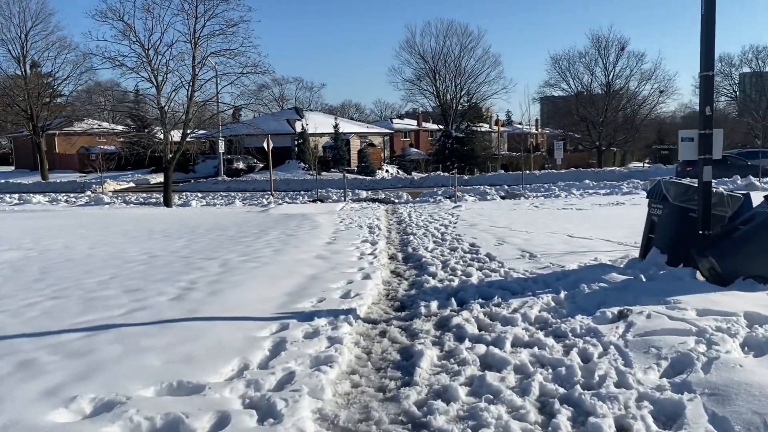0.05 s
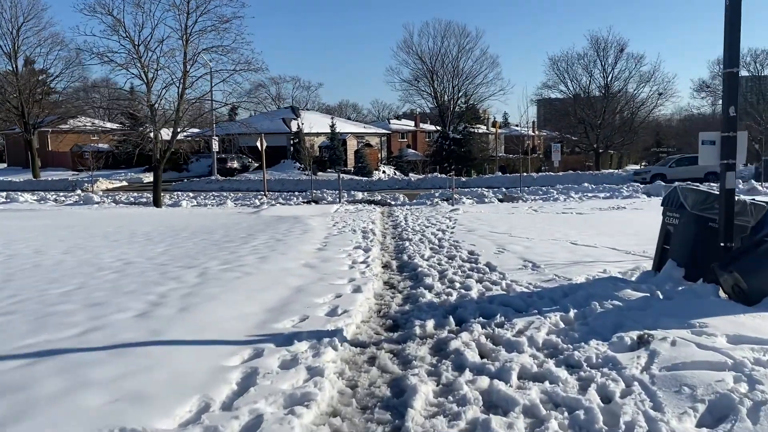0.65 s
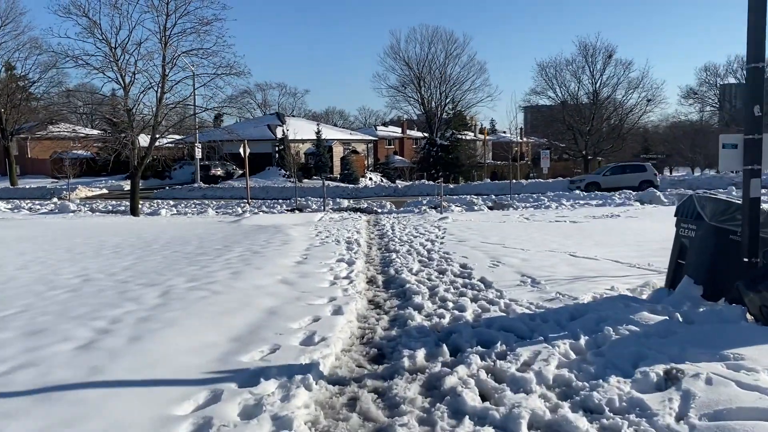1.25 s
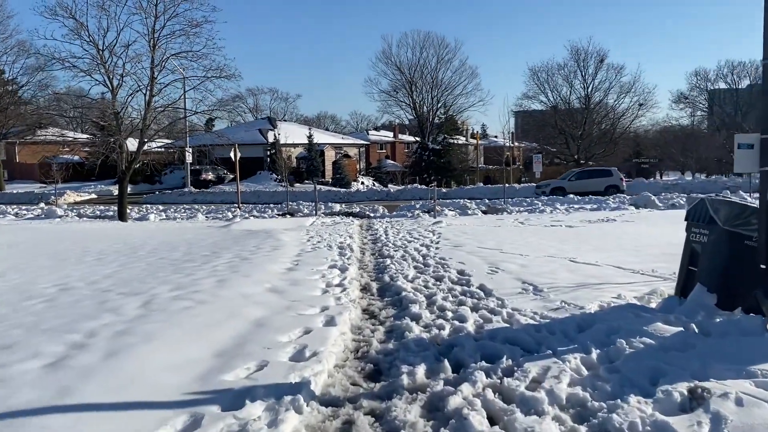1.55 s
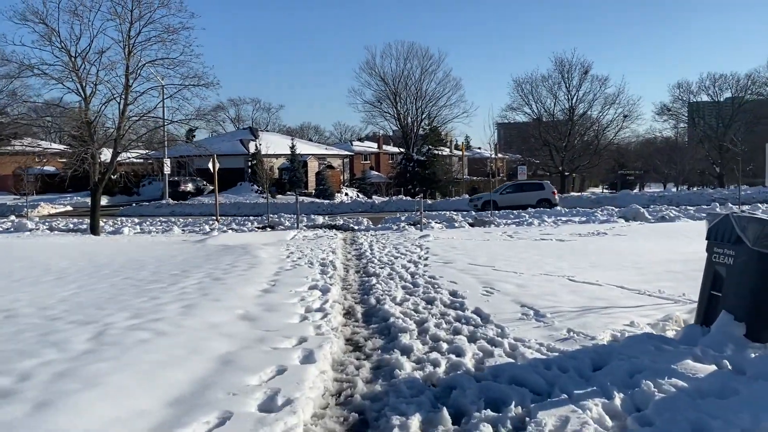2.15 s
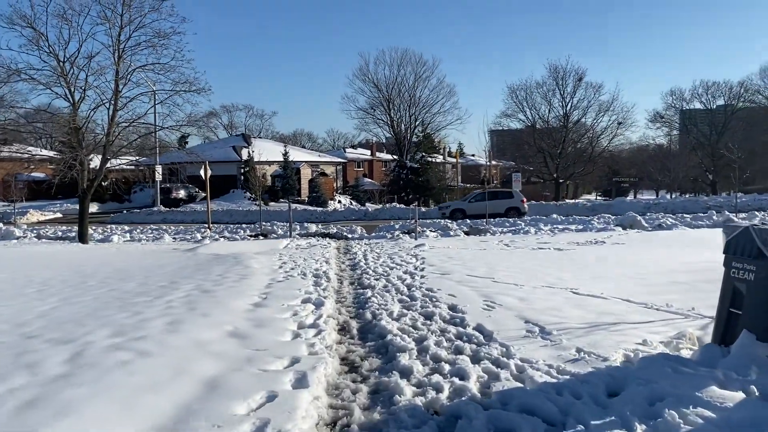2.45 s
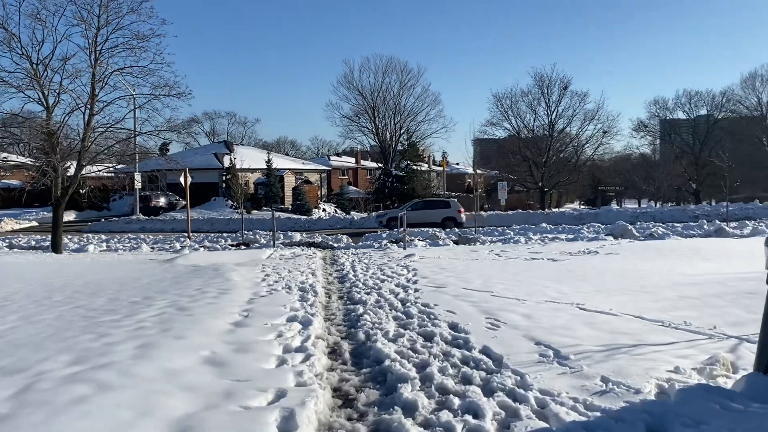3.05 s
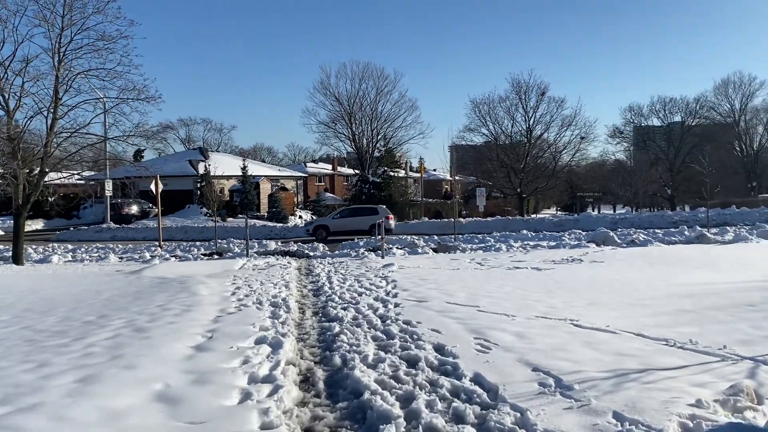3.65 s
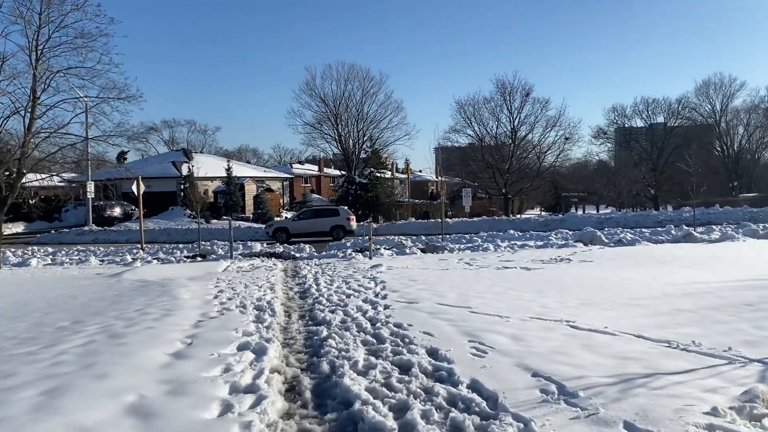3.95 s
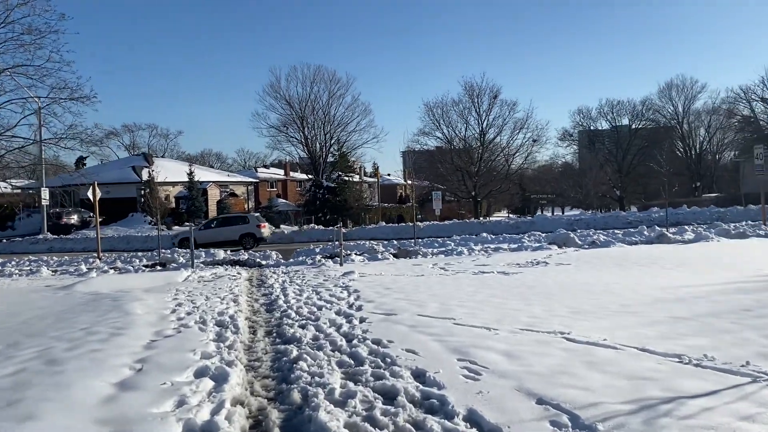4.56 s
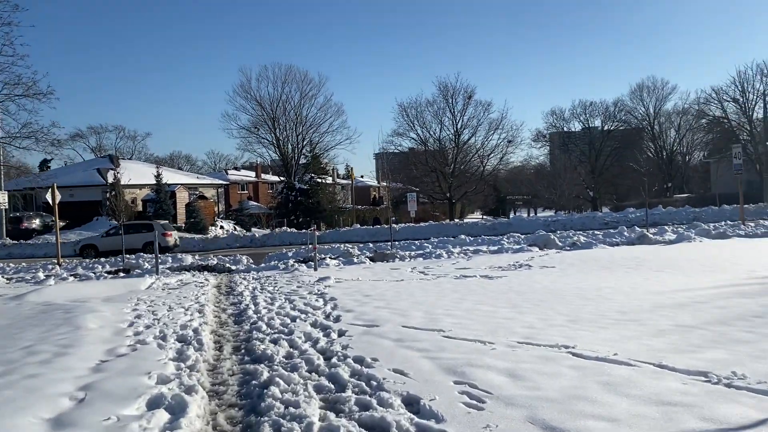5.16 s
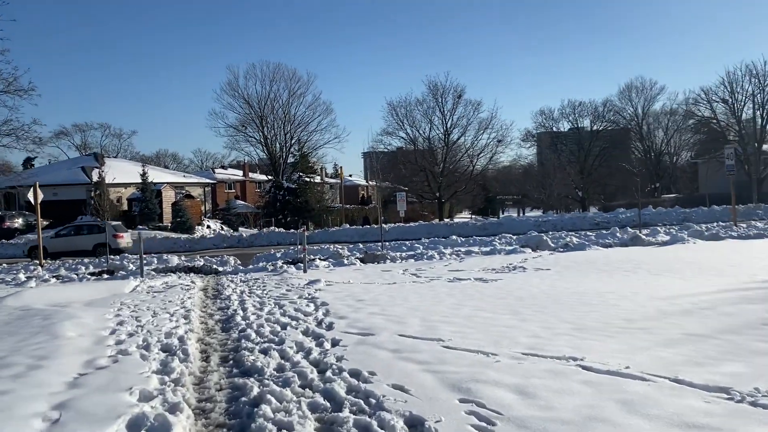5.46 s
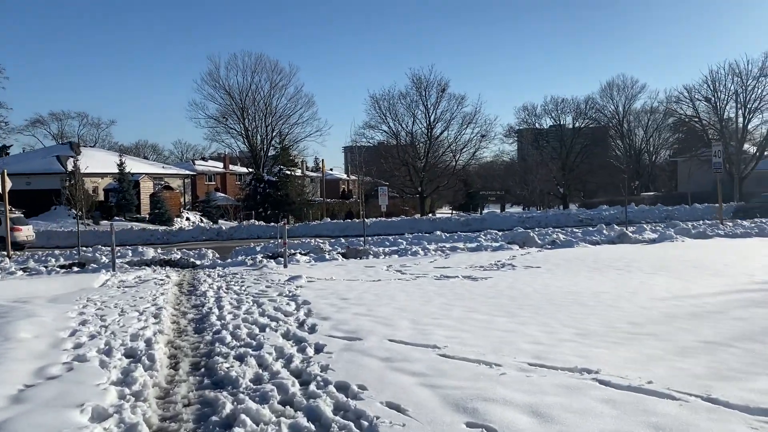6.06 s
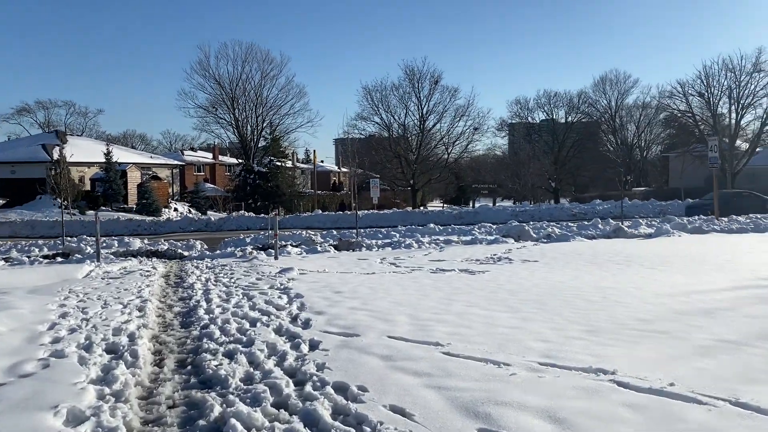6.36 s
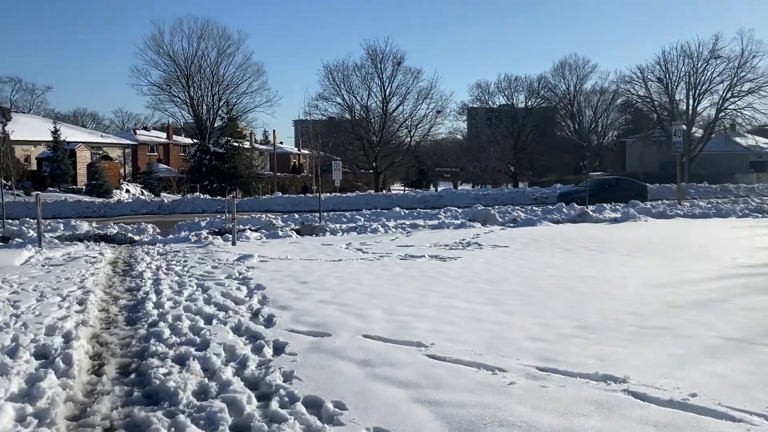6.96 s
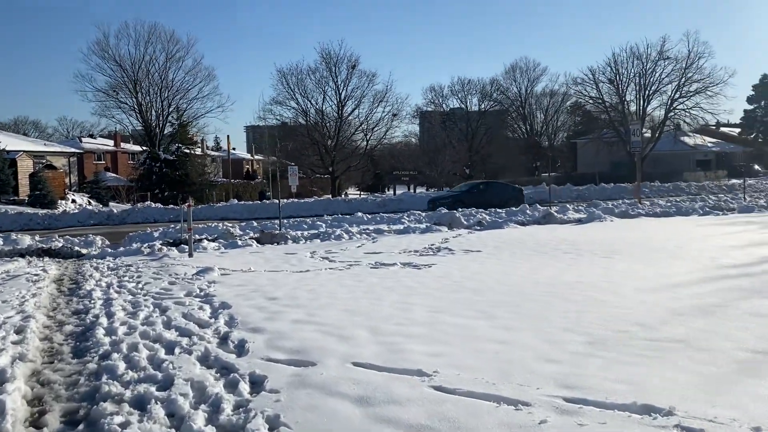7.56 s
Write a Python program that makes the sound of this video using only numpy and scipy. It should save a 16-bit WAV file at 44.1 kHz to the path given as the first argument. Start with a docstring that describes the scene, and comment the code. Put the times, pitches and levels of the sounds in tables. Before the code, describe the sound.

Boots walk at a steady pace along a trodden path in a snowy field, close below a handheld microphone. Each step crunches and hisses, with sharp snaps of icy crust and small creaks as the snow packs. Wind rumbles and flutters on the microphone throughout, gusting harder around the middle. Some way ahead, car tyres roar softly on a slushy road.

```python
"""Footsteps on crusted snow

A trodden path across a snowy field, heard from a phone in the walker's hand. At each step the icy
crust snaps, loose grains hiss, and the snow under the sole crunches and creaks as it packs.
Wind buffets the microphone; some way ahead, tyres roar and hiss on a slushy road."""
import sys
import numpy as np
from scipy import signal
from scipy.fft import rfft, irfft, next_fast_len
from scipy.io import wavfile
from scipy.ndimage import uniform_filter1d

SR = 44100
rng = np.random.default_rng(int(sys.argv[2]) if len(sys.argv) > 2 else 0)


def wav_record(signal):
    """Record a signal, one row per channel, as 16-bit PCM in the file named by sys.argv[1]."""
    frames = np.transpose(np.atleast_2d(signal))
    bounded = np.clip(frames, -1, 1)
    # unit amplitude maps onto the largest positive 16-bit level
    quanta = np.round(bounded * 32767).astype(np.int16)
    wavfile.write(sys.argv[1], SR, quanta)


N = 344862

# spectrum of crunching snow, under the sole and in the crust (f/Hz, level/dB)
CRUNCH_SPECTRUM = [(200, -31), (450, 4.5), (800, 6.5), (1400, 3.5), (2200, 0.5), (3200, -8.5), (5000, -21),
                   (9000, -44)]


def from_db(db):
    """Decibels to gain."""
    return 10 ** (np.asarray(db) / 20)


def rms_one(x):
    """Scale to unit rms."""
    return x / np.sqrt(np.mean(x ** 2) + 1e-20)


def as_strong(x, model):
    """Scale x to the rms of the model."""
    return rms_one(x) * np.sqrt(np.mean(model ** 2))


def even_out(x, seconds):
    """Hold the short-term rms near 1, so that a level curve sets the strength."""
    power = uniform_filter1d(np.mean(x ** 2, axis=0), size=int(seconds * SR) + 1)
    return x / np.sqrt(np.abs(power) + 1e-6)


def times():
    """The time of every sample in seconds."""
    return np.arange(N) / SR


def in_time(rows):
    """One curve for each column after the time, its points joined by straight lines."""
    s, *columns = np.transpose(rows)
    return [np.interp(times(), s, column) for column in columns]


def colour(x, spectrum):
    """Filter by a spectrum drawn over log frequency; rms 1."""
    hz, db = np.transpose(spectrum)
    bin_hz = np.arange(N // 2 + 1) * SR / N
    gain = from_db(np.interp(np.log(bin_hz + 1), np.log(hz), db))
    return rms_one(irfft(rfft(x) * gain, N))


def drift(rate_hz):
    """A slow random wander, softly limited to +-2."""
    size = next_fast_len(N // 20 + 2)  # one point per 20 samples
    hz = np.arange(size // 2 + 1) * SR / (20 * size)
    slow = rms_one(irfft(rfft(rng.standard_normal(size)) / (1 + (hz / rate_hz) ** 2), size))
    return np.interp(np.arange(N) / 20, np.arange(size), 2 * np.tanh(slow / 2))


def spread(pair, side_db):
    """Use two unrelated signals as mid and side; gives left and right."""
    side = from_db(side_db)
    return (pair[0] + side * pair[1] * np.array([[1], [-1]])) / np.sqrt(1 + side ** 2)


def stereo_noise(side_db, length=N):
    """White noise, wider as side_db rises towards 0."""
    return spread(rng.standard_normal((2, length)), side_db)


def resonate(x, hz, width_hz):
    """One resonance with gain 1 at its peak."""
    r = np.exp(-np.pi * width_hz / SR)
    feedback = [1, -2 * r * np.cos(2 * np.pi * hz / SR), r * r]
    return signal.lfilter(np.array([1, 0, -1]) * (1 - r * r) / 2, feedback, x)


def pulse(age):
    """An envelope that rises to 1 at age 1 and dies away."""
    return (age * np.exp(1 - age)) ** 2


def add(out, s, sound):
    """Mix a short sound in at time s."""
    start = int(np.clip(s * SR, 0, N - 1))
    out[..., start:start + sound.shape[-1]] += sound[..., :N - start]


def grains(per_s, size_db):
    """Two trains of impulses at random moments, mostly small, a few large."""
    out, born = np.zeros((2, N)), rng.random((2, N)) < per_s / SR
    count = np.count_nonzero(born)
    sizes = from_db(size_db * np.minimum(rng.exponential(1, count), 4))
    out[born] = sizes * rng.choice([-1, 1], count)
    return out


def far_road(echo_s, echo_db):
    """Tyres some way ahead: a wide roar and a faint hiss of slush, made hollow by a reflection."""
    # cars passing (t/s, roar level/dB, relative spray level/dB)
    traffic = [(0.0, -52, -84), (0.6, -53, -88), (1.85, -51.5, -76.5), (2.35, -46.5, -63.5),
               (2.9, -48.5, -65.5), (3.1, -52, -83.5), (3.9, -47.5, -66), (4.9, -47.5, -77.5),
               (5.97, -45.5, -79), (7.82, -46.5, -77.5)]
    # spectrum of the tyre roar (f/Hz, level/dB)
    roar_spectrum = [(40, 22.5), (150, -11.5), (400, 12), (700, 6.5), (1300, -1), (1950, -0.5), (3000, -10),
                     (5000, -18.5), (9000, -27.5), (16000, -78)]
    # spectrum of the spray from wet tyres (f/Hz, level/dB)
    spray_spectrum = [(1500, -13), (3000, 2), (4700, 7.5), (7200, -2.5), (8300, 9.5), (11000, -4),
                      (16000, -17)]
    roar_db, spray_db = in_time(traffic)
    roar = colour(stereo_noise(side_db=-4), roar_spectrum)
    direct = stereo_noise(side_db=-10)
    reflection = from_db(echo_db) * np.roll(direct, int(echo_s * SR), axis=1)
    spray = colour(direct + reflection, spray_spectrum)
    return from_db(roar_db) * roar + from_db(spray_db + 4.5) * spray


def wind(breeze_db, flutter_growth):
    """Turbulence at the microphone ports: a deep rumble, and small eddies that flutter past in lumps."""
    # strength of the wind on the microphone (t/s, level/dB)
    gusts = [(0.0, -40.5), (0.45, -36), (1.0, -36.5), (1.97, -36), (2.1, -41), (2.7, -35), (3.2, -35.5),
             (3.68, -37.5), (3.96, -23.5), (4.06, -33), (4.45, -32), (4.85, -36.5), (5.0, -32.5),
             (5.45, -26), (5.85, -29), (6.15, -38), (7.3, -38), (7.82, -39)]
    # the air falls calm for a moment (middle t/s, half length/s, depth/dB)
    lulls = [(0.17, 0.021, 14), (0.35, 0.069, 8.5), (0.665, 0.021, 6), (1.172, 0.035, 4.5),
             (1.738, 0.022, 12), (2.272, 0.017, 16), (2.593, 0.11, 9.5), (2.955, 0.13, 4.5),
             (4.114, 0.089, 15), (4.903, 0.042, 10), (5.105, 0.039, 7), (6.266, 0.065, 4),
             (6.518, 0.042, 11), (7.63, 0.029, 12), (1.83, 0.016, 3), (5.218, 0.018, 6),
             (5.346, 0.018, 8.5), (5.476, 0.018, 9), (5.916, 0.016, 12), (6.675, 0.023, 7)]
    # spectrum of the rumble (f/Hz, level/dB)
    rumble_spectrum = [(25, -34), (40, -15), (60, 2), (80, 0.5), (115, -2), (170, -8.5), (260, -19.5),
                       (600, -84)]
    # spectrum of the flutter (f/Hz, level/dB)
    flutter_spectrum = [(70, -27), (130, -13), (200, 3.5), (300, 2.5), (450, -6.5), (650, -18), (1000, -41)]
    t = times()
    lull_db = sum(db * np.exp(-np.minimum(((t - s) / half_s) ** 2, 20)) for s, half_s, db in lulls)
    gust_db = in_time(gusts)[0] - lull_db
    flutter_db = breeze_db - 10 + flutter_growth * (gust_db - breeze_db)  # stronger wind flutters more
    lumps = drift(rate_hz=20)
    pressure = stereo_noise(side_db=-10) * from_db(3.6 * lumps)
    flicks = spread(grains(per_s=300, size_db=3.5), side_db=-10) * from_db(7.3 * lumps)
    rumble = even_out(colour(pressure, rumble_spectrum), seconds=0.13)
    flutter = even_out(colour(flicks, flutter_spectrum), seconds=0.218)
    return from_db(gust_db + 0.5) * rumble + from_db(flutter_db) * flutter


def eddies(rise_cycles, wake_db, wake_s):
    """A puff is a pressure swing of a cycle or two, with a short turbulent wake."""
    # single puffs hitting the microphone (t/s, relative level/dB, f/Hz)
    puffs = [(0.12, -23.5, 260), (0.378, -29, 204), (0.423, -28, 106), (0.466, -28, 72.6),
             (0.529, -28.5, 288), (0.707, -24, 90.5), (0.752, -22.5, 155), (0.972, -19.5, 145),
             (1.03, -24.5, 145), (1.203, -33, 134), (1.295, -21.5, 94), (1.56, -24, 148),
             (1.654, -27.5, 140), (1.773, -27, 139), (1.892, -29, 106), (1.931, -20, 167),
             (1.973, -21.5, 112), (2.309, -25.5, 142), (3.085, -25, 159), (3.457, -29, 135),
             (3.743, -19.5, 174), (3.812, -16.5, 310), (3.845, -27, 377), (3.935, -16.5, 210),
             (4.215, -29, 151), (4.259, -26.5, 276), (4.588, -28, 167), (4.982, -20, 240),
             (5.029, -20, 146), (5.174, -20.5, 274), (5.254, -19.5, 228), (5.372, -22, 360),
             (5.39, -16, 109), (5.433, -21.5, 310), (5.459, -24.5, 640), (5.591, -27, 330),
             (5.628, -25.5, 262), (5.681, -18.5, 270), (5.747, -22, 141), (5.87, -21.5, 294),
             (5.951, -24, 130), (6.1, -23, 116), (6.365, -28.5, 117), (6.615, -18, 73.5),
             (6.62, -25.5, 186), (6.692, -23.5, 103), (6.734, -24, 167), (6.834, -24.5, 198),
             (6.986, -23, 81.4), (7.101, -27.5, 159), (7.188, -26, 145), (7.285, -27.5, 132),
             (7.469, -23, 124), (7.749, -24.5, 188)]
    out, t = np.zeros((2, N)), np.arange(SR // 8) / SR
    wake = pulse(t / wake_s)
    for s, db, hz in puffs:
        swing = pulse(t * hz / rise_cycles) * np.sin(2 * np.pi * (hz * t + rng.random()))
        noise = stereo_noise(side_db=-7.5, length=len(t))
        churn = resonate(resonate(noise, hz, hz), hz, 2 * hz)
        add(out, s, from_db(db) * (swing + from_db(wake_db) * as_strong(churn * wake, wake)))
    return out


def creaks(slips_per_s, slip_t60, scatter, overtone_db, grit_db):
    """The sole sticks and slips; each slip is a gritty knock, mostly higher as the snow gets denser."""
    # packed snow creaking (start t/s, end t/s, first f/Hz, last f/Hz, level/dB)
    glides = [(0.238, 0.293, 950, 1360, -44.5), (0.313, 0.39, 1380, 1620, -56.5),
              (1.503, 1.634, 1180, 1440, -43), (2.091, 2.216, 1240, 1460, -48.5),
              (2.735, 2.767, 2200, 2820, -49), (2.799, 2.884, 760, 1150, -44.5),
              (3.337, 3.409, 730, 1200, -53.5), (4.037, 4.116, 1320, 1320, -51.5),
              (4.648, 4.767, 930, 1030, -54), (7.038, 7.089, 1390, 1720, -47.5),
              (7.605, 7.669, 1050, 1500, -45.5)]
    out, t = np.zeros(N), np.arange(SR // 40) / SR
    envelope = from_db(-60 * t / slip_t60) * (1 - np.exp(-t / 0.00088))
    for start, end, first_hz, last_hz, level_db in glides:
        chance, noises = rng.standard_normal((80, 4)), rng.standard_normal((80, len(t)))
        moments = start + np.cumsum(np.exp(0.45 * chance[:, 0])) / slips_per_s
        creak = np.zeros(N)
        for s, (_, size, detune, upper_detune), noise in zip(moments[moments < end], chance, noises):
            hz = np.interp(s, [start, end], [first_hz, last_hz]) * np.exp(scatter * detune)
            upper_hz = 2 * hz * np.exp(scatter * upper_detune)
            ring = np.sin(2 * np.pi * hz * t) + from_db(overtone_db) * np.sin(2 * np.pi * upper_hz * t)
            grit = from_db(grit_db) * rms_one(resonate(noise, hz, hz))
            add(creak, s, (ring + grit) * envelope * from_db(1.15 * size))
        out += from_db(level_db) * rms_one(creak) * np.sqrt((end - start) * SR / N)
    return out


def pops(t60, grit_db):
    """A frozen lump gives way all at once: a short, hollow, gritty knock."""
    # single lumps under the boot (t/s, f/Hz, level/dB)
    lumps = [(0.486, 1950, -44), (0.62, 1550, -43), (0.944, 1520, -30), (1.588, 1200, -22),
             (1.834, 1400, -38), (2.209, 1400, -35), (3.098, 1460, -36), (4.014, 730, -27),
             (5.9, 1480, -27), (6.218, 1720, -31), (7.005, 1360, -28), (7.646, 1450, -27)]
    out, t = np.zeros(N), np.arange(SR // 20) / SR
    envelope = from_db(-60 * t / t60) * (1 - np.exp(-t / 0.0015))
    for s, hz, db in lumps:
        grit = rms_one(resonate(resonate(rng.standard_normal(len(t)), hz, hz), hz, 2 * hz))
        add(out, s, from_db(db) * envelope * (np.sin(2 * np.pi * hz * t) + from_db(grit_db) * grit))
    return out


def crust_snaps(ring_width_hz, crumble_db, crumble_t60):
    """A crack runs through the crust in milliseconds; the piece rings, splinters and crumbles."""
    # pieces of crust snapping (t/s, breaking time/s, main ring f/Hz, its level/dB,
    # second ring f/Hz, its level/dB, splinter level/dB, crunch level/dB)
    cracks = [(0.12, 0.00074, 3640, -36, 6300, -30, -25.5, -32.5),
              (0.195, 0.00062, 2530, -31, 5600, -40, -39, -54),
              (0.433, 0.0055, 1720, -48, 3740, -62, -47.5, -40.5),
              (0.638, 0.0058, 2400, -47, 2850, -54, -48.5, -46.5),
              (.856, 0.0022, 1210, -40, 2980, -45, -59, -51),
              (1.279, 0.0021, 1590, -45, 4900, -41, -52, -43),
              (1.6058, 0.0015, 1450, -30.5, 3100, -38, -37, -33),
              (2.026, .003, 1850, -40, 4160, -68, -45, -53), (2.44, 0.0039, 1640, -47, 3530, -56, -41, -44),
              (2.694, 0.0014, 3970, -41, 7800, -47, -40, -52),
              (3.772, 0.0043, 1480, -55, 6100, -66, -54.5, -50),
              (4.849, 0.0048, 920, -45, 1590, -49, -52, -40.5),
              (5.0689, 0.0059, 1890, -36, 3540, -34.5, -35.5, -33),
              (5.693, 0.0076, 2660, -40, 1820, -49, -61, -36),
              (5.803, 0.0038, 2650, -36.5, 1780, -50, -45, -38.5),
              (5.911, 0.00079, 2720, -23, 3800, -28.5, -33, -52),
              (6.2017, 0.0041, 1450, -41.5, 2340, -45, -37.5, -39),
              (6.287, .002, 1720, -38, 3500, -59, -50, -50),
              (6.3739, 0.0011, 2240, -25.5, 3300, -36, -38, -36),
              (6.398, 0.0021, 3250, -36, 1720, -56, -40, -35),
              (7.405, 0.0068, 1270, -49, 4770, -52, -47, -45.5),
              (7.7605, 0.0019, 1940, -36, 3000, -41, -32.5, -41)]
    # spectrum of splintering ice (f/Hz, level/dB)
    splinter_spectrum = [(1800, -18), (3200, 4.5), (7500, 5.5), (10500, 6), (12500, -12), (14500, 1),
                         (16000, -31)]
    out, t = np.zeros((2, N)), np.arange(SR // 10) / SR
    fragments = stereo_noise(side_db=-7.5)
    splinters, crunch = colour(fragments, splinter_spectrum), colour(fragments, CRUNCH_SPECTRUM)
    crumble = from_db(crumble_db - 60 * t / crumble_t60)
    for s, break_s, main_hz, main_db, second_hz, second_db, splinter_db, crunch_db in cracks:
        part = (int(s * SR) + np.arange(len(t))) % N
        age = t / break_s
        force = pulse(age) + (1 - np.exp(-age)) ** 2 * crumble
        snap = from_db(splinter_db) * as_strong(force * splinters[:, part], force)
        snap += from_db(crunch_db) * as_strong(force * crunch[:, part], force)
        for hz, db in ((main_hz, main_db), (second_hz, second_db)):
            ring = resonate(resonate(force * fragments[:, part], hz, ring_width_hz), hz, hz / 2)
            snap += from_db(db) * as_strong(ring, force)
        add(out, s, snap)
    return out


def clumps(per_s, size_db, q, low_hz, high_hz, pitch_count):
    """Each breaking clump rings briefly at one of a set of pitches."""
    clicks, dealt = grains(per_s, size_db), rng.integers(0, pitch_count, N)
    pitches = np.geomspace(low_hz, high_hz, pitch_count)
    return sum(resonate(clicks * (dealt == k) + 1e-18, hz, hz / q) * (-1) ** k
               for k, hz in enumerate(pitches))


def footfalls(sag_db, trickle_db, trickle_s):
    """Gains of hiss and crunch: a step sets in, holds while the foot rolls, and dies; scuffs swell."""
    # a foot sinks in, heel to toe (t/s, attack/s, roll/s, release/s,
    # then relative levels: heel hiss/dB, toe hiss/dB, heel crunch/dB, toe crunch/dB)
    steps = [(0.123, 0.014, 0.14, 0.044, -51.5, -46.5, -68, -42),
             (0.765, 0.0033, 0.21, 0.012, -44.5, -41.5, -47, -44.5),
             (1.388, 0.038, 0.27, 0.0092, -43, -50.5, -46, -46.5),
             (2.022, 0.013, 0.17, 0.018, -49.5, -43.5, -52, -44.5),
             (2.657, 0.007, 0.23, 0.012, -47, -50, -58, -53),
             (3.305, 0.023, 0.049, 0.082, -49.5, -49, -53, -48.5),
             (4.014, 0.021, 0.034, 0.089, -46, -53, -50, -43),
             (4.58, 0.06, 0.098, 0.056, -50, -46, -57, -43.5),
             (5.18, 0.027, 0.07, 0.11, -55, -51, -58, -44.5),
             (5.695, 0.0063, 0.12, 0.025, -47, -44.5, -58, -42.5),
             (6.271, 0.012, 0.13, 0.059, -47, -45, -58, -45.5),
             (6.962, 0.037, 0.098, 0.04, -44, -48, -46.5, -45.5),
             (7.532, 0.0099, 0.033, 0.1, -41.5, -48, -42, -45)]
    # a boot brushes the snow in passing (middle t/s, half length/s, relative hiss/dB, crunch/dB)
    scuffs = [(0.358, 0.0056, -54, -45), (1.147, 0.037, -57.5, -66), (1.22, 0.019, -55, -76),
              (1.284, 0.016, -45, -49), (1.327, 0.033, -53, -63), (1.758, 0.074, -57.5, -67),
              (2.27, 0.045, -57, -51.5), (2.726, 0.026, -45, -46.5), (2.849, 0.021, -44, -38.5),
              (3.187, 0.0067, -58, -50.5), (3.247, 0.008, -58, -60), (3.915, 0.019, -45.5, -44.5),
              (4.042, 0.013, -42, -60), (4.19, 0.012, -56, -53), (4.433, 0.0063, -58.5, -50),
              (4.85, 0.011, -52.5, -44.5), (5.104, 0.03, -59.5, -51), (5.2, 0.0089, -49, -49),
              (5.47, 0.0082, -53.5, -47.5), (5.964, 0.047, -55.5, -51), (6.242, 0.0048, -53, -53),
              (6.515, 0.01, -49, -48), (6.867, 0.024, -55, -50.5), (7.451, 0.034, -59, -72)]
    t, power = times(), np.zeros((2, N))
    for s, attack_s, roll_s, release_s, hiss_heel, hiss_toe, crunch_heel, crunch_toe in steps:
        contact = np.clip((t - s) / attack_s + 1, 0, 1)
        rolled = np.clip((t - s) / roll_s, 0, 1)
        rested_s = np.maximum(t - s - roll_s, 0)
        release = np.exp(-rested_s / release_s)
        trickle = from_db(trickle_db) * np.exp(-rested_s / trickle_s)  # loose grains keep running
        # the hiss eases while the weight passes from heel to toe
        hiss_db = hiss_heel + rolled * (hiss_toe - hiss_heel) - sag_db * np.sin(np.pi * rolled)
        crunch_db = crunch_heel + rolled * (crunch_toe - crunch_heel)
        power[0] += (contact * from_db(hiss_db) * np.maximum(release, trickle)) ** 2
        power[1] += (contact * from_db(crunch_db) * release) ** 2
    for s, half_s, hiss_db, crunch_db in scuffs:
        near = np.abs(t - s) < 10 * half_s
        swell = np.exp(-np.abs((t[near] - s) / half_s) ** 2.9)  # a little boxier than a bell
        power[:, near] += from_db([[hiss_db], [crunch_db]]) ** 2 * swell
    return np.sqrt(power)


def snow_underfoot(sole_right_db):
    """Ice bonds break in small avalanches: grains hiss, flakes crackle, clumps crunch, creak and pop."""
    # spectrum of fine, loose grains (f/Hz, level/dB)
    hiss_spectrum = [(1500, 2.5), (2800, 2), (4000, 4.5), (6200, 0), (8500, 4), (10500, 5.5), (12500, -6.5),
                     (14500, -0.5), (16000, -47)]
    hiss_gain, crunch_gain = footfalls(sag_db=1, trickle_db=-7.5, trickle_s=0.065)
    avalanches = drift(rate_hz=27)
    powder = spread(grains(per_s=9000, size_db=1.5), side_db=-10.5)
    hiss = colour(powder * from_db(2.5 * avalanches + 0.92 * drift(rate_hz=110)), hiss_spectrum)
    flakes = clumps(per_s=250, size_db=2.7, q=13, low_hz=1200, high_hz=3900, pitch_count=14)
    crackle = from_db(-5) * even_out(spread(flakes, side_db=-10), seconds=0.12)
    lumps = clumps(per_s=800, size_db=-0.5, q=10.8, low_hz=448.6, high_hz=4520, pitch_count=18)
    crunch = colour(spread(lumps, side_db=-11) * from_db(0.65 * avalanches), CRUNCH_SPECTRUM)
    creak = creaks(slips_per_s=220, slip_t60=0.015, scatter=0.1, overtone_db=-14, grit_db=-7.5)
    sole = crunch_gain * even_out(crunch, seconds=0.092) + creak + pops(t60=0.02, grit_db=-10)
    pan = from_db(sole_right_db / 2 * np.array([[-1], [1]]))
    return from_db(0.66) * hiss_gain * (hiss + crackle) + sole * pan


def scene():
    """Open air: boots just below the microphone, wind right on it, the road in the distance."""
    crust = crust_snaps(ring_width_hz=600, crumble_db=-15, crumble_t60=0.1)
    air = wind(breeze_db=-40, flutter_growth=1.264)
    air += from_db(-0.5) * eddies(rise_cycles=0.6, wake_db=-13, wake_s=0.0096)
    # the microphone loses the deepest part of the buffeting, and the rest stays low in pitch
    air = signal.sosfilt(signal.butter(8, 37, "high", fs=SR, output="sos"), air)
    air = signal.sosfilt(signal.butter(6, 720, fs=SR, output="sos"), air)
    return snow_underfoot(sole_right_db=5.5) + crust + air + far_road(echo_s=0.000635, echo_db=-7)


def record(dry):
    """The phone's two microphone ports part in phase towards the treble; the top is cut at 15.5 kHz."""
    # phase between the ports (f/Hz, lead of the left/rad)
    port_phase = [(0, 0), (1800, .1), (3200, 1.3), (5800, .9), (7000, -.1), (8450, -3.1), (9700, -6.1),
                  (10700, -6.5), (12200, -9.4), (13400, -12.4), (14800, -12.9), (15600, -15.7)]
    hz = np.arange(N // 2 + 1) * SR / N
    lead = np.interp(hz, *np.transpose(port_phase))
    left = irfft(rfft(dry[0]) * np.exp(1j * lead), N)
    top_cut = signal.ellip(10, 0.2, 80, 15500, fs=SR, output="sos")
    return signal.sosfilt(top_cut, [left, dry[1]])


dry = scene()
out = record(dry)
wav_record(out)
```